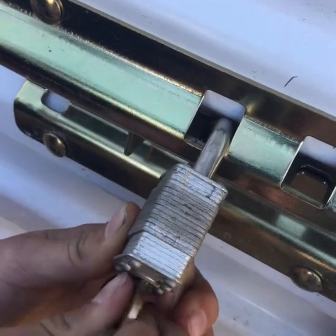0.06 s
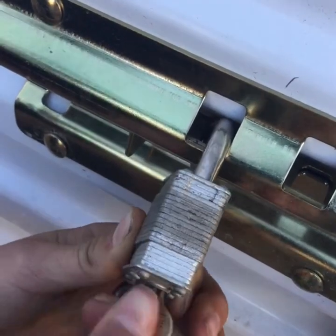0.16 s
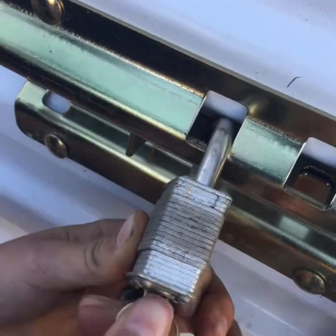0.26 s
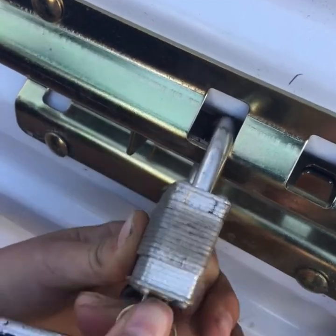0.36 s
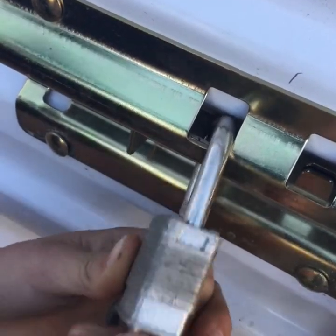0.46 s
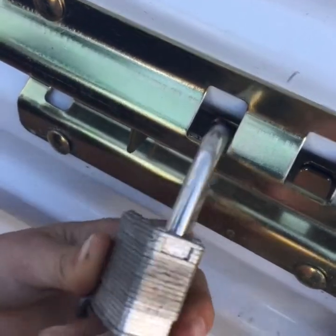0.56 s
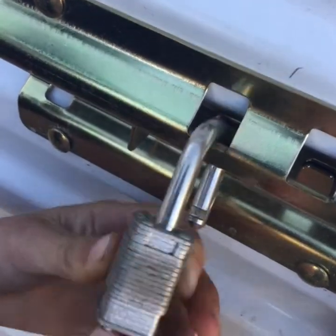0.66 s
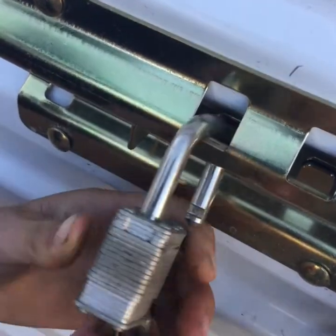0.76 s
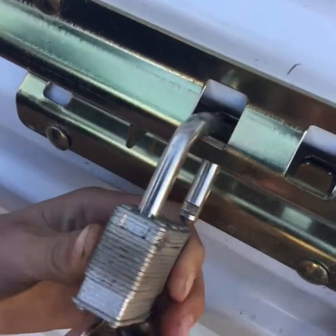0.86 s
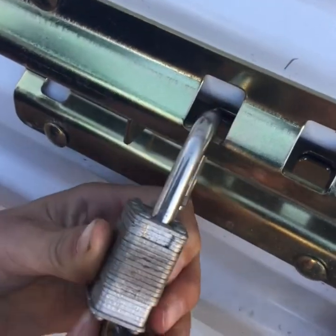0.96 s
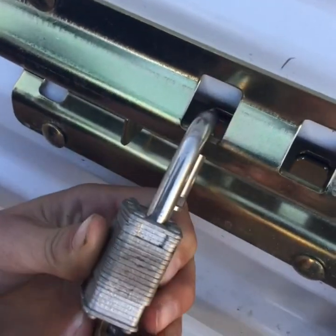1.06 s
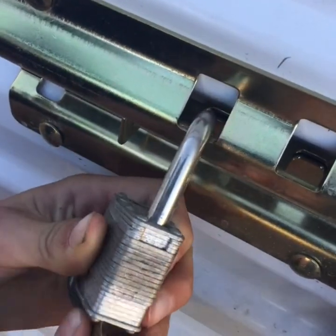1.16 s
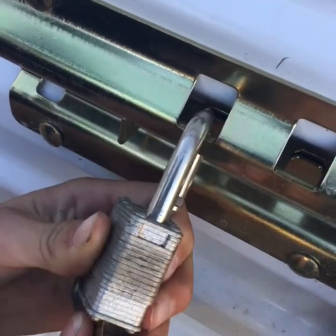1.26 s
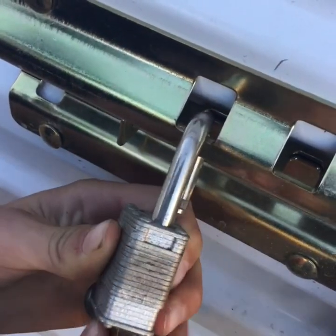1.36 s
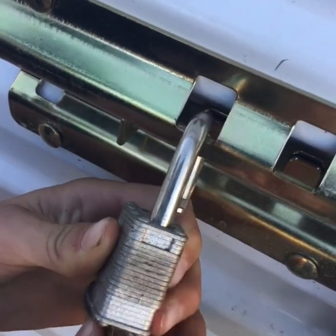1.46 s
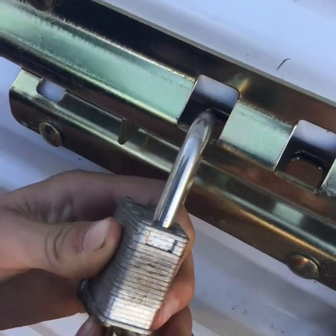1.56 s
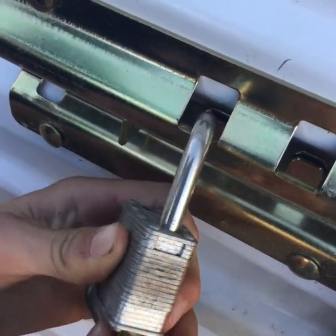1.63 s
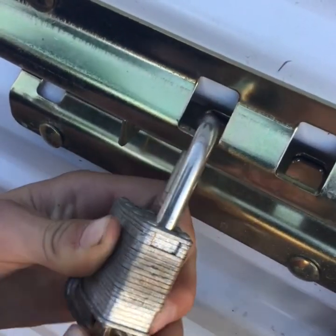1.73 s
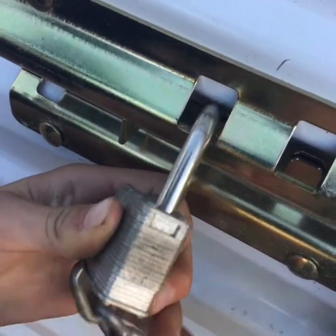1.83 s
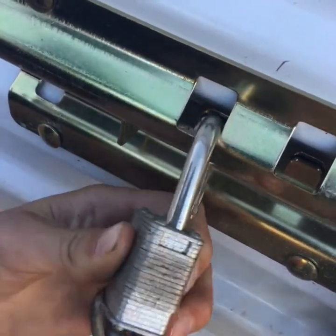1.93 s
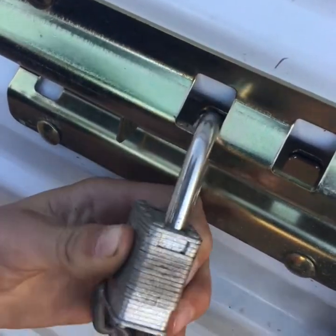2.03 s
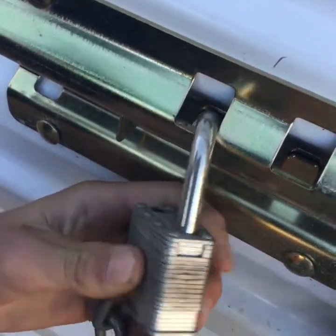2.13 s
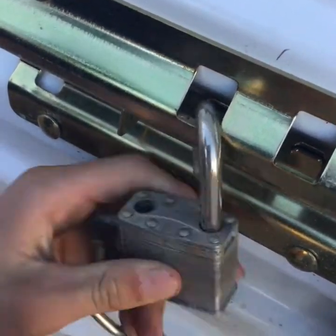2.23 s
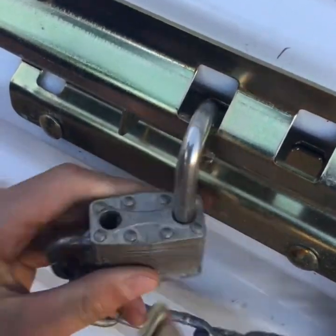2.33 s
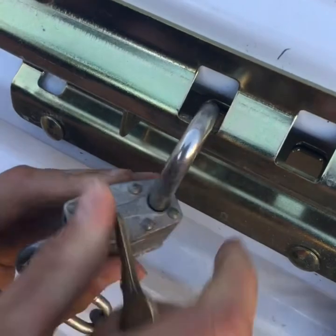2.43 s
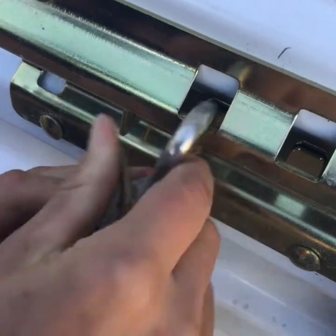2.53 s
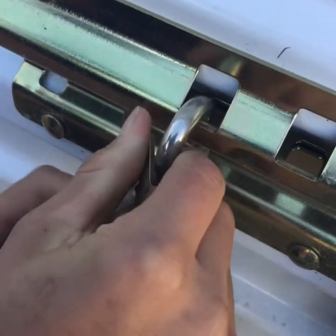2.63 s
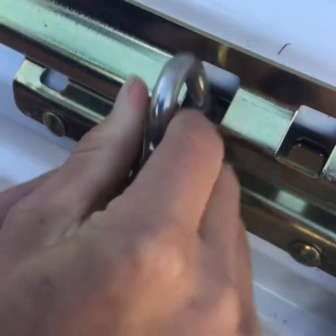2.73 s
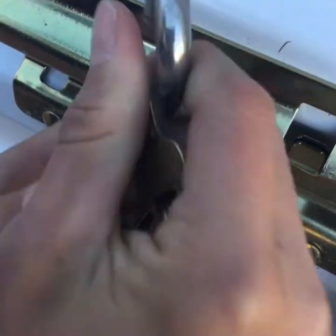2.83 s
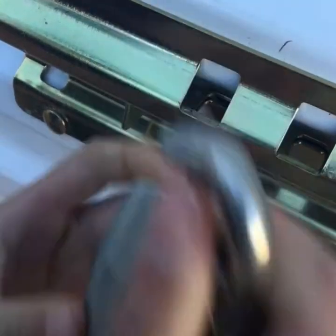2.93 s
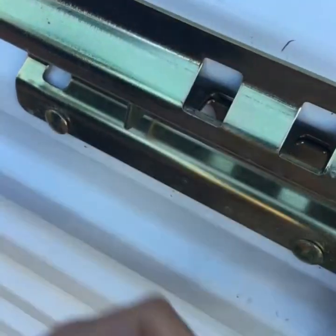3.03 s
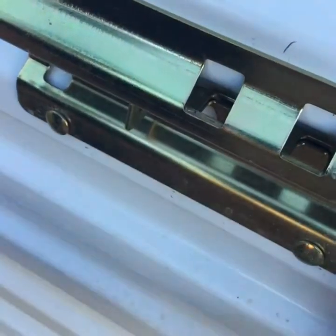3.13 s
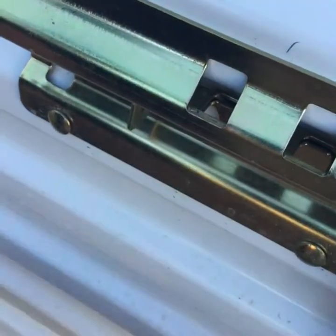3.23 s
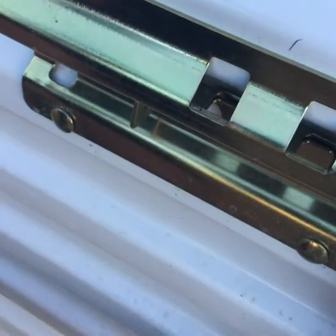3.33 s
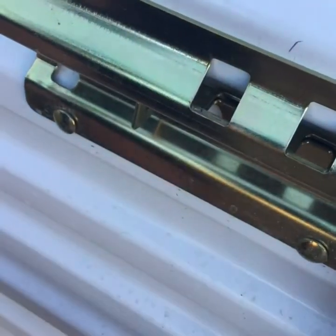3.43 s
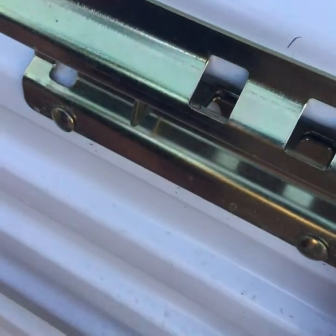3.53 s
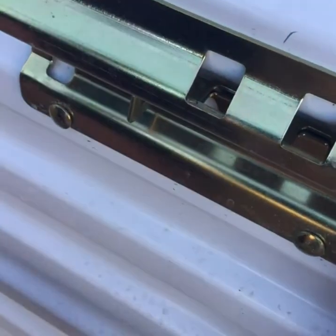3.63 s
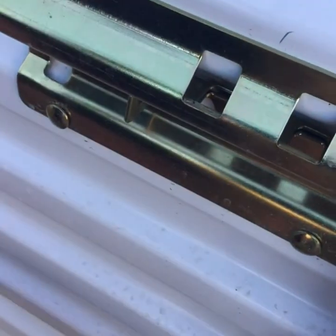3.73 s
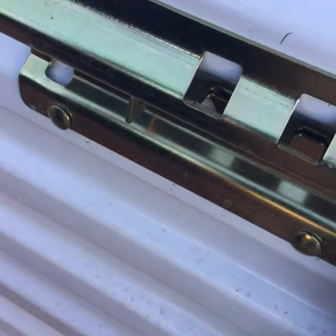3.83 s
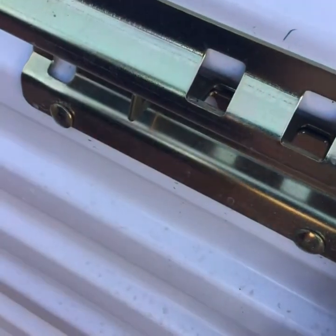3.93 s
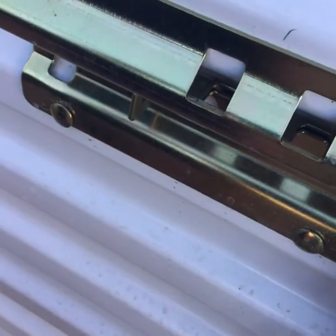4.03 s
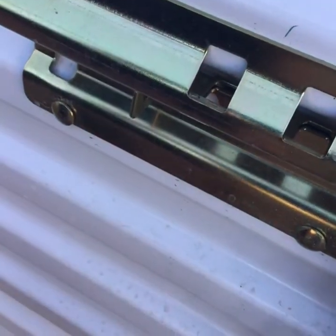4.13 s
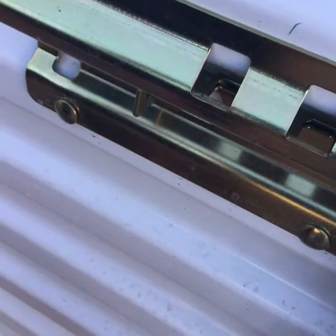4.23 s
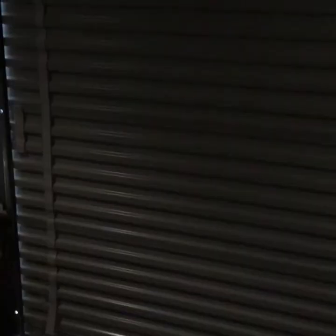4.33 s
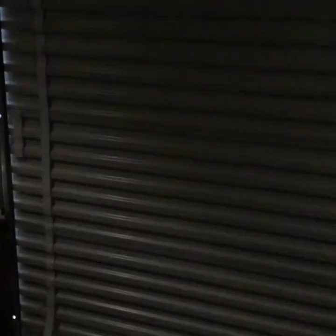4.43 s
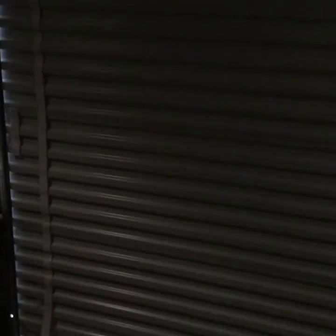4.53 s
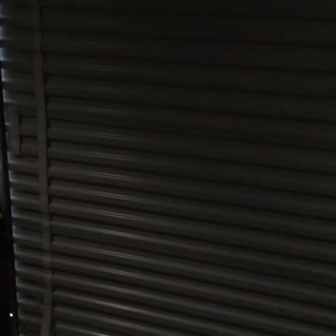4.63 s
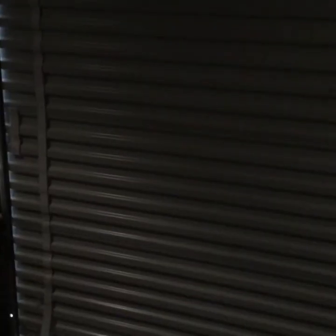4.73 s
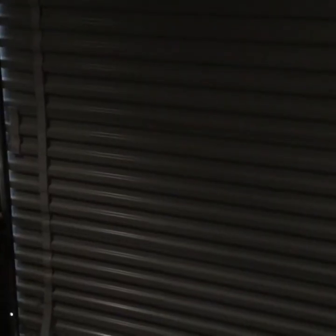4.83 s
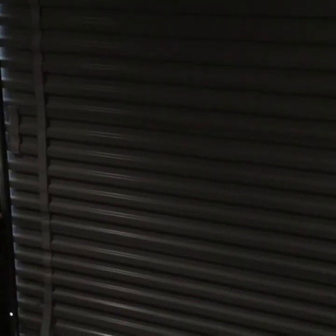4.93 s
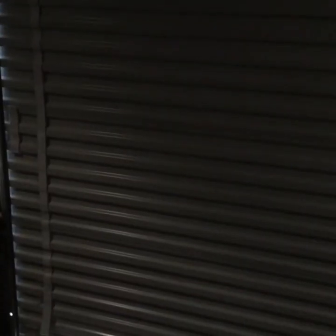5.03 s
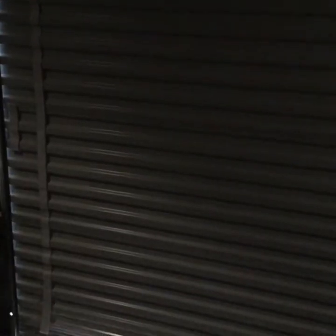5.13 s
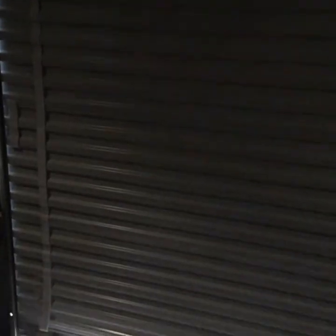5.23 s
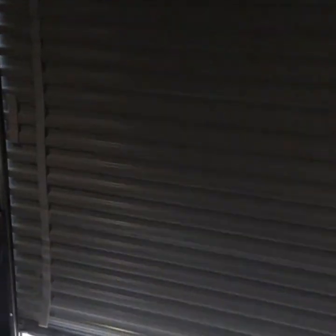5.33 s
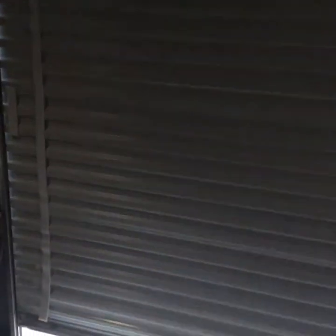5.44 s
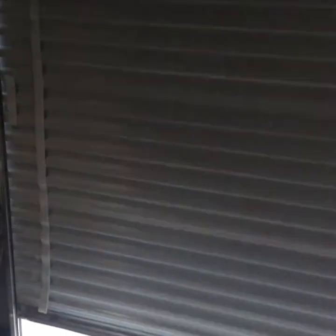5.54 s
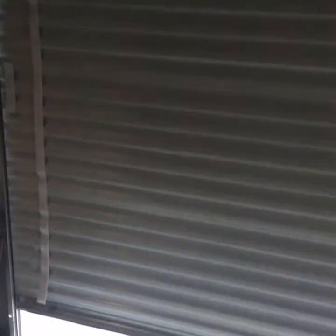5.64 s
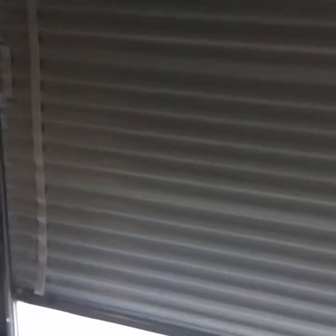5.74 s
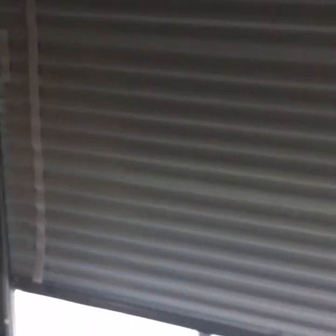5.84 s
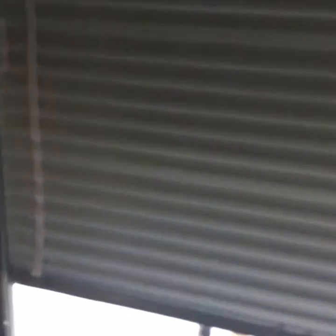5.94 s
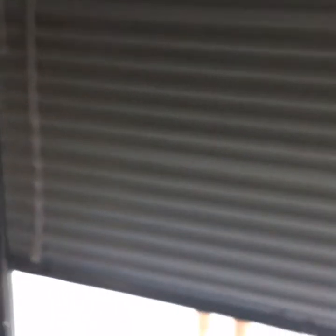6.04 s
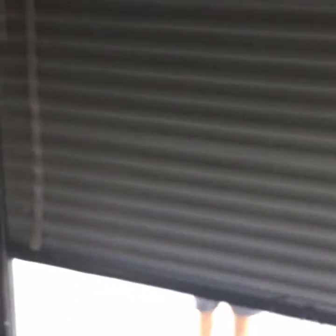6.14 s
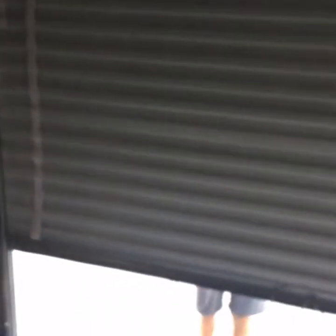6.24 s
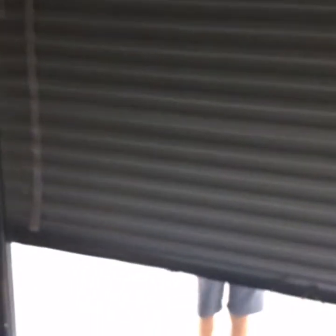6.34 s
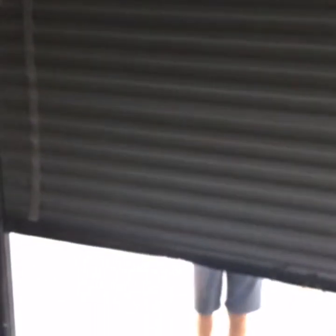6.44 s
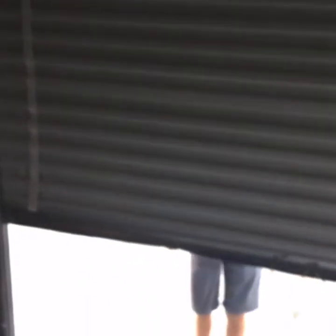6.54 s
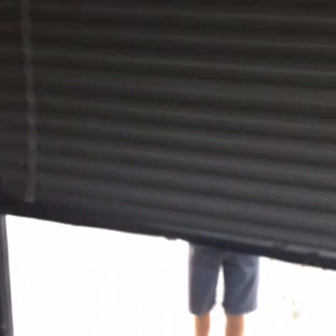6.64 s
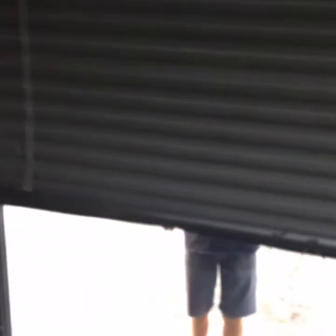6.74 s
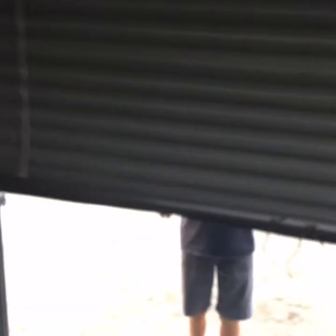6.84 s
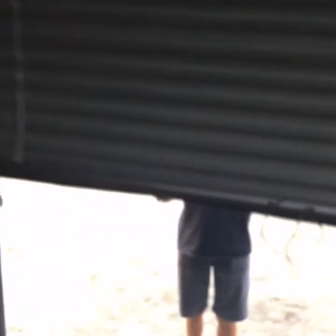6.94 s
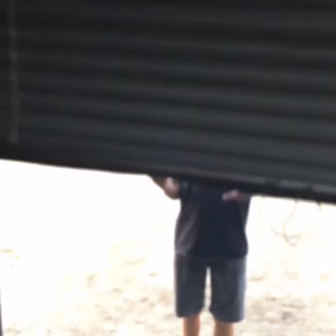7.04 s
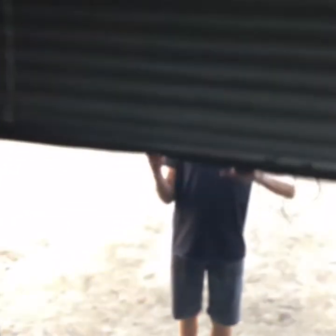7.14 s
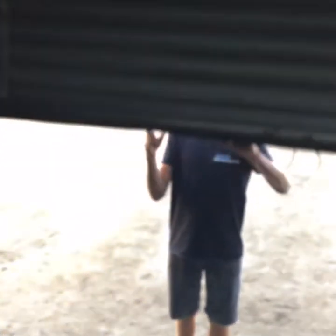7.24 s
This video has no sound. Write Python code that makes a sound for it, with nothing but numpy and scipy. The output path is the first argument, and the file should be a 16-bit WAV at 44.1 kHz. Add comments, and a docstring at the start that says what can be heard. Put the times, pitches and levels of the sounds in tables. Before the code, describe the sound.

Close metallic clicks, scrapes and key jingles, hard bolt bangs, a blink of silence, then a roller door rattling open from inside.

```python
"""A padlock with a bunch of keys is worked out of the steel latch of a roll-up door, heard close by outdoors.
Impulsive contacts excite the latch, its plate and the door's sheet; the keys are decaying modes that
are choked as they touch again, over a clatter of tiny brushes; then the bolt is slammed over.
After a short silence one hears, inside the unit, the corrugated door rattle up its rails as bands of
filtered clicks and noise."""
import sys
import numpy as np
from scipy import signal
from scipy.fft import rfft, irfft
from scipy.io import wavfile
from scipy.ndimage import uniform_filter1d

SR = 44100
rng = np.random.default_rng(int(sys.argv[2]) if len(sys.argv) > 2 else 0)


def inscribe(sig):
    """Save sig as 16-bit PCM at rate SR to the path in sys.argv[1].

    A 1-D sig is mono; a 2-D sig holds one channel per row.
    Samples are clipped to [-1, 1] before scaling.
    """
    pcm = np.round(np.clip(np.atleast_2d(sig).T, -1, 1) * 32767)
    wavfile.write(sys.argv[1], SR, pcm.astype(np.int16))


N = 321489

# All source levels stand before the gain in scene() and the saturation in record().
# Rattles of the keys. Each row: start in seconds, stop in seconds, brushing level in dB, loudest ring in dB,
# how much weaker each next set rings in dB, sets of KEY_MODES that ring (a = first), loudest first.
RATTLES = [(0.018, 0.025, -56, -62, 3, "g"), (0.07, 0.13, -55, -81, 3, "e"),
           (0.129, 0.143, -44, -43, 4, "hiec"), (0.145, 0.155, -42, -36, 3, "bhegic"),
           (0.162, 0.2, -50.5, -44.5, 3.3, "heigc"), (0.202, 0.214, -55, -47, 3.3, "hie"),
           (0.243, 0.266, -52, -45.5, 3, "ehibcfg"), (0.275, 0.36, -61, -55, 9, "f"),
           (0.325, 0.372, -60, -45, 3, "i"), (0.613, 0.686, -44.5, -57, 3, "cbedg"),
           (0.733, 0.824, -49, -34, 8.2, "aebd"), (0.83, 0.887, -48, -43.5, 3, "ec"),
           (0.88, 0.904, -39.5, -49, 3, "eadbg"), (0.93, 0.944, -48, -50, 3, "agb"),
           (0.989, 1.014, -53, -65, 3, "e"), (1.058, 1.126, -77, -45, 13, "ead"),
           (1.168, 1.184, -50.5, -51, 4, "eacd"), (1.203, 1.222, -50, -52, 4, "egc"),
           (1.238, 1.334, -49, -37.5, 3.2, "cefbagd"), (1.4, 1.55, -91, -59, 5, "daf"),
           (1.56, 1.67, -57, -54.5, 3, "d"), (1.698, 1.743, -40.5, -45, 3, "ecabfg"),
           (1.757, 1.81, -46, -47, 4.6, "ecbga"), (1.815, 1.834, -40, -37.5, 2.1, "ecbadfg"),
           (1.87, 1.902, -42, -45, 3, "ecga"), (1.91, 1.975, -46, -38, 10, "ebcdg"),
           (1.97, 2.005, -46.5, -56, 3, "afgec"), (2.034, 2.086, -41, -33.5, 6.8, "ebdgca"),
           (2.075, 2.128, -68.5, -36, 3.1, "gebdac"), (2.135, 2.172, -55, -43, 7.6, "gc"),
           (2.218, 2.28, -52.5, -58, 5.7, "afg"), (2.29, 2.343, -58, -51.5, 3.6, "fead"),
           (2.435, 2.47, -51, -45, 2.5, "dfecg"), (2.547, 2.554, -53, -47, 5.1, "cfeg"),
           (2.56, 2.587, -50, -43, 3, "ahebg"), (2.654, 2.656, -35, -47, 12, "ge"),
           (2.82, 2.893, -54, -61, 4, "cef"), (2.933, 2.985, -51, -39.5, 9.8, "cegb"),
           (2.985, 3.027, -61, -54, 8, "ea"), (3.083, 3.2, -55, -49, 2.1, "edgcbaf"),
           (3.256, 3.276, -54, -51, 1.6, "egac"), (3.39, 3.45, -62, -74, 3, "eg"),
           (3.508, 3.513, -57, -67, 3.1, "e"), (3.534, 3.549, -58, -62, 3.1, "eg"),
           (3.702, 3.742, -60, -62, 2.3, "dbfeg"), (3.768, 3.797, -54, -59, 2.4, "gcdf"),
           (3.998, 4.013, -66, -73, 2.5, "f")]
# Sets of modes that sound together. Each mode: frequency in Hz, level in dB, undamped t60 in seconds.
KEY_MODES = [
    [(6948, 0, 2.5), (2461, -8, 1.1), (8431, -5, 1.2), (13330, -16, .9), (8909, -18, 1.1)],
    [(6713, 0, 1.1), (13040, -9, .9)],
    [(8145, 0, .9)],
    [(6185, 0, 1.4), (6455, -6, 1.5)],
    [(10525, 0, .6), (10700, -6, .6), (13280, -9, .5)],
    [(9216, 0, 1.2), (3440, -5, 1.0)],
    [(14880, 0, 1.5)],
    [(2490, 2, .14), (5250, -8, .15)],
    [(8620, 0, .5), (7250, -2, .3)],
]
# Spectrum of the corrugated sheet. Each row: frequency in Hz, density in dB per Hz.
SHEET_SPECTRUM = [(18, -32.5), (45, -1.5), (270, -4), (500, -3), (800, -3), (1080, -9), (1260, -6),
                  (3880, -20.5), (4870, -17.5), (6250, -28.5), (12000, -54.5), (15600, -82.5)]
LOCK_OUT_S = 3.3  # the padlock leaves the latch


def undb(db):
    """Amplitude ratio of a level: twenty decibels per factor of ten."""
    return 10 ** (np.asarray(db) / 20)


def unit(x):
    """Normalisation to an rms of 1."""
    return x / np.sqrt(np.mean(x ** 2))


def curves(table):
    """Linear interpolation in time of the columns of a table, the first being seconds."""
    s, *columns = np.transpose(table)
    return [np.interp(np.arange(N) / SR, s, c) for c in columns]


def band(x, lo_hz, hi_hz):
    """Butterworth band-pass: only the frequencies between two edges pass."""
    edges = [lo_hz, min(hi_hz, .48 * SR)]
    return signal.sosfilt(signal.butter(3, edges, "band", fs=SR, output="sos"), x)


def colour(x, points):
    """Minimum-phase filter of a (Hz, dB) spectrum: folding the cepstrum of its log gain makes it causal."""
    hz, db = np.transpose(points)
    grid = np.linspace(1, SR / 2, num=2049)
    log_gain = np.log(undb(np.interp(np.log(grid), np.log(hz), db)))
    cepstrum = irfft(log_gain)
    cepstrum[1:2048] *= 2
    cepstrum[2049:] = 0
    response = irfft(np.exp(rfft(cepstrum)))
    return signal.oaconvolve(x, response, axes=-1)[:len(x)]


def clatter(per_s, spread_db, hiss):
    """Shot noise: random clicks of very unequal size over a share of hiss, at rms 1."""
    chance = rng.random((3, N))
    occurs = chance[0] < per_s / SR
    polarity = np.sign(chance[1] - .5)
    size = undb(-spread_db * np.log(chance[2] + 0.011))
    return unit(unit(occurs * polarity * size) + hiss * rng.standard_normal(N))


def walk(rate):
    """Slow random modulation: levels held for 1 / rate seconds and averaged twice; spread near 1."""
    k = int(SR / rate)
    held = np.repeat(rng.standard_normal(N // k + 1), k)
    return 1.3 * uniform_filter1d(uniform_filter1d(held, k), k)[:N]


def sheet_response():
    """Impulse response of the sheet: a dense modal field that dies fastest in the treble, and a few strong modes."""
    # Each row: frequency in Hz, t60 in seconds.
    decay_times = [(60, 0.8), (420, 0.43), (1300, 0.55), (2600, 0.45), (4500, 0.25), (7700, 0.17),
                   (16000, 0.08)]
    # Modes that stand out. Each row: frequency in Hz, relative level in dB, t60 in seconds.
    strong_modes = [(318, 2, .5), (690, 1, .3), (1289, 0, .5), (1405, 0, .45), (1728, 0, .4),
                    (2135, -2, .35), (2306, -2, .35), (2418, -4, .3)]
    t = np.arange(SR) / SR
    hz, t60 = np.transpose(decay_times)
    dense = 0
    for lo in 30 * 2. ** np.arange(0, 9, .5):  # half-octave bands
        centre = lo * 2 ** (1 / 4)
        decay = np.log(1000) / np.interp(np.log(centre), np.log(hz), t60)
        noise = band(rng.standard_normal(SR), lo, np.sqrt(2) * lo)
        dense = dense + np.sqrt(decay) * np.exp(-decay * t) * noise  # the same energy at any decay
    rings = sum(undb(db) * np.sin(2 * np.pi * f * t) * 1000 ** (-t / d) for f, db, d in strong_modes)
    return (unit(colour(dense, SHEET_SPECTRUM)) + undb(-11) * unit(rings)) / np.sqrt(SR)


def contact_forces():
    """Impact with rebounds: each blow is a tick and a dying chatter; rows feed body, treble, boom, brief boom."""
    # The lock knocks the latch. Each row: time in seconds, level in dB, boom of the sheet in dB re that level.
    knock_rows = [(0.13, -33, -6.5), (0.243, -34, -17), (0.324, -32.5, -6.5), (0.3605, -30, 0),
                  (0.375, -39, -14), (0.381, -6, -31), (0.396, -20.5, -10), (0.407, -17, -3.5),
                  (0.418, -19, -41), (0.456, -15, -27), (0.528, -34, -28), (0.547, -23.5, -24),
                  (0.613, -31, -8.5), (0.705, -20, -19.5), (0.8689, -16, -19.5), (1.0176, -28, -48),
                  (1.229, -27.5, -13.5), (1.475, -38.5, -2.5), (1.613, -37.5, 0.5), (1.63, -28.5, -8.5),
                  (1.66, -25.5, -22), (1.724, -30.5, -6), (1.736, -16.5, -5.5), (1.7496, -18.5, -14.5),
                  (1.769, -13.5, -45), (1.81, -12.5, -16.5), (1.8365, -22.5, -13), (1.876, -28, -17.5),
                  (2.0595, -27.5, -37.5), (2.1318, -22.5, -10.5), (2.172, -36, -20), (2.2509, -33.5, -5),
                  (2.2864, -25.5, -28), (2.3215, -20, -38), (2.4326, -36, -12.5), (2.5027, -31.5, -22),
                  (2.6299, -14, -17.5), (2.6731, -14.5, -6.5), (3.0808, -35, 1), (3.1344, -30, -0.5)]
    # The bolt is slammed over and rebounds. Each row: time in seconds, level in dB, boom in dB re that level,
    # softness of the contact as a time constant in milliseconds.
    slam_rows = [(3.2218, -5, -18, 0.0085), (3.229, -4.5, -36.5, 0.02), (3.292, -13, -22, 0.062),
                 (3.3556, 1.5, -19, 0.012), (3.3701, 0.5, -21.5, 0.035), (3.414, 0.5, -16.5, 0.064),
                 (3.442, -5.5, -23.5, 0.031), (3.503, -22.5, -26, 0.029), (3.8536, -15.5, 0, 0.0083),
                 (4.085, 0, -20.5, 0.049), (4.2216, -32, 6, 0.052)]
    chatter_t60_s, brief_t60_s = 0.065, 0.052
    force = np.zeros((4, N))
    bounces = clatter(5000, spread_db=3.0, hiss=0.81)
    t = np.arange(SR // 10) / SR
    brief = 1000 ** (-t / brief_t60_s)  # only the first bounces are heavy enough to move the bolt
    tick = 1000 ** (-t[:SR // 2000] / 0.00025)
    # light knocks have relatively more treble than heavy ones
    blows = [(s, db, boom, -8.5 - 0.56 * (db + 27.5), 0, 4.1) for s, db, boom in knock_rows]
    blows += [(s, db, boom, -18, soft_ms, 2.2) for s, db, boom, soft_ms in slam_rows]
    for s, db, boom_db, treble_db, soft_ms, tick_size in blows:
        i = int(s * SR)
        push = (1 - np.exp(-t / 0.00029)) * 1000 ** (-t / chatter_t60_s) * bounces[i:i + len(t)]
        push[:SR // 2000] += tick_size * tick  # first contact is one hard tick
        push = undb(-16) * unit(push)  # the same energy however the bounces fall
        slow = np.exp(-1000 / SR / max(soft_ms, 1e-4))  # a softer contact pushes longer and loses its treble
        push = signal.lfilter([(1 - slow) ** 2], [1, -2 * slow, slow ** 2], push)
        gains = undb(db + np.array([[0], [treble_db], [boom_db], [boom_db]]))
        force[:, i:i + len(t)] += gains * [push, push * brief ** 0.66, push, push * brief]
    return force


def latch():
    """Source and resonator: contact forces crack in the latch and ring on in the sheet; friction scrapes both."""
    # Fumbling. Each row: time in seconds, scrape of steel on the latch in dB, rumble in the sheet in dB,
    # deep bass in dB re rumble.
    fumbling = [(0, -31, -29.5, -1), (0.06, -38, -36.5, 1), (0.12, -42, -42, 1), (0.22, -44, -45.5, 0),
                (0.33, -48.5, -44, 1.5), (0.5, -44.5, -42.5, -6.5), (0.8, -47.5, -46, 3.5),
                (1.43, -51.5, -51, 6), (1.6, -52, -53, 10.5), (1.68, -42.5, -37, 6.5),
                (1.85, -31.5, -35.5, 1), (2.0, -50, -45.5, 1), (2.2, -42, -42, -1), (2.4, -44.5, -48, 0),
                (2.53, -53.5, -46.5, -4), (2.61, -36, -37, -7), (3.05, -48.5, -43.5, -1.5),
                (3.12, -35.5, -46, -8), (3.2, -44, -55, -4), (3.55, -33.5, -30.5, -12),
                (3.8, -42.5, -41.5, 1.5), (4.27, -43, -38.5, 0.5)]
    # Spectrum of the latch. Each row: frequency in Hz, density in dB per Hz.
    latch_spectrum = [(120, -48.5), (200, -15.5), (1000, -2), (1770, -2), (3900, -6), (4680, -1),
                      (6170, -10), (6880, -11), (8580, -7), (16000, -46.5)]
    body_force, treble_force, boom_force, brief_force = contact_forces()
    scrape_db, rumble_db, deep_db = curves(fumbling)
    scrape = undb(scrape_db + 3.04 * walk(25.16)) * clatter(1400, spread_db=3.0, hiss=0.95)
    rumble = undb(rumble_db + 1.0 * walk(15)) * rng.standard_normal(N)
    body, sheet = colour(body_force, latch_spectrum), sheet_response()

    crack = undb(2.5) * band(body, 540, 5800)
    crack += undb(-1.0) * band(band(treble_force, 4900, 11000), 4000, 12000)
    ring = signal.oaconvolve(undb(-9.5) * body_force, band(sheet, 920, 12000))[:N]
    boom_response = band(sheet, 43, 1100) + undb(-6.5) * band(sheet, 2400, 2700)
    boom = signal.oaconvolve(undb(-1.0) * boom_force + undb(3.5) * brief_force, boom_response)[:N]
    thud = undb(14) * band(brief_force, 180, 1150)  # the bolt's own dull, short body

    hooked = np.arange(N) < LOCK_OUT_S * SR
    lock_scrape, bolt_scrape = scrape * hooked, scrape * ~hooked
    rub = undb(11) * band(colour(lock_scrape, SHEET_SPECTRUM), 700, 11000)
    rub += undb(-11.0) * band(colour(lock_scrape, latch_spectrum), 2500, 9900)
    rub += undb(15.0) * band(colour(bolt_scrape, SHEET_SPECTRUM), 800, 2600)  # the loose bolt buzzes on, duller
    rub += undb(-20.5) * band(colour(bolt_scrape, latch_spectrum), 4000, 11000)
    rub += undb(11.5) * band(rumble, 124.4, 430) + undb(19.0) * band(undb(deep_db) * rumble, 49, 110)
    return crack + ring + boom + thud + rub


def jingle():
    """Random impulses on damped resonators: keys brush each other in tiny clicks and short pings."""
    # How readily each set in KEY_MODES answers a light brush. Each entry: relative level in dB.
    brushed_db = [-2.5, -5, 3, -8.5, 2.5, -4, -8, -4, -7]
    t = np.arange(N) / SR
    busy = undb(-61.0) * (t < LOCK_OUT_S)  # faint brushing between the rattles
    for start, stop, db, *_ in RATTLES:
        busy = busy + undb(db) * (t > start) * 1000 ** (-np.clip(t - stop, 0, 1) / 0.087)
    taps = busy * clatter(65, spread_db=5.0, hiss=0)
    out = undb(-5) * band(taps, 4300, 5800)

    shake_db = 1.7 * walk(50)
    for lo in 3600 * 2 ** np.arange(0, 2.1, 1 / 3):  # each pitch range has its own tiny touches
        touch = busy * undb(shake_db + 2.1 * walk(34.68)) * clatter(400, spread_db=3.5, hiss=0.3)
        out = out + undb(-4.0 - 3.6 * np.log2(lo / 6000)) * band(touch, lo, 1.19 * lo)

    t = t[:SR // 10]
    small_modes_hz = np.geomspace(5000, 15000, num=16) * (1 + .03 * rng.standard_normal(16))
    for hz in small_modes_hz:  # many small modes clink briefly
        clink = np.sin(2 * np.pi * hz * t) * 1000 ** (-t / 0.029)
        out = out + undb(-37) * signal.oaconvolve(busy * clatter(45, spread_db=4.0, hiss=0), clink)[:N]

    for db, key in zip(brushed_db, KEY_MODES):  # each key is touched on its own
        muted = sum(undb(g) * np.sin(2 * np.pi * f * t) for f, g, _ in key if f > 5000) * 1000 ** (-t / 0.08)
        touches = busy * clatter(60, spread_db=4.0, hiss=.12)
        out = out + undb(db - 38) * signal.oaconvolve(touches, muted)[:N]
    return out


def ring_levels(top_db, step_db, sets):
    """Modal excitation: level of each set in KEY_MODES in one rattle; sets not named stay still."""
    return [top_db - step_db * sets.find(name) if name in sets else -np.inf for name in "abcdefghi"]


def keys():
    """Free modal vibration: struck at the start, decaying exponentially, choked in milliseconds at the stop."""
    held = 0.61  # fingers on the bunch shorten every t60 to this share
    out = np.zeros(N)
    chance = rng.standard_normal((len(RATTLES), 2 * sum(map(len, KEY_MODES))))
    shimmer = [undb(3.4 * walk(70)) for _ in KEY_MODES]  # light brushes keep nudging each ring
    for (start, stop, _, *struck), draw in zip(RATTLES, chance):
        t = np.arange(int((stop - start + 0.03) * SR)) / SR
        onset = 1 - np.exp(-t / 0.00044)
        choke = 1000 ** (-np.maximum(t - (stop - start), 0) / 0.012)
        now = slice(int(start * SR), int(start * SR) + len(t))
        sets = zip(ring_levels(*struck), KEY_MODES, shimmer)
        modes = [(f, db + g, d, nudge[now]) for db, key, nudge in sets for f, g, d in key]
        for k, (f, db, t60, nudge) in enumerate(modes):
            detune, level_draw = draw[2 * k], draw[2 * k + 1]
            tone = np.sin(2 * np.pi * f * (1 + .001 * detune) * t + 10 * detune)
            decay = 1000 ** (-t / (held * t60))
            out[now] += undb(db + 1.8 * level_draw) * nudge * onset * choke * decay * tone
    return out


def thuds():
    """Modal synthesis of a plate: heavy, dull blows ring its low modes; sharp ones leave a brief steel note."""
    # Heavy blows on the latch plate. Each row: time in seconds, level in dB, tilt in dB per octave.
    heavy_blows = [(0.264, -39, 0), (2.209, -40, 5.5), (2.219, -33, 6), (2.663, -26.5, 4), (2.6737, -18, 1),
                   (2.684, -27, -1), (3.853, -20.5, 2), (3.861, -20.5, 0.5)]
    # Modes of the plate. Each row: frequency in Hz, relative level in dB, t60 in seconds.
    plate_modes = [(129, -4.5, 0.088), (240, -5, 0.037), (354, -2, 0.072), (558, -4.5, 0.052),
                   (696, -1.7, 0.12), (828, -3.5, 0.091), (955, -7.5, 0.11), (1220, -9.5, 0.061),
                   (1500, -16, 0.046)]
    # Brief notes of the shackle on the latch. Each row: time in seconds, frequency in Hz, level in dB.
    steel_notes = [(0.382, 2510, -17), (0.406, 4440, -23), (0.418, 5600, -27), (0.455, 4330, -22.5),
                   (0.706, 1650, -34), (0.869, 1950, -37), (1.018, 1830, -37.5), (2.322, 1500, -43),
                   (2.321, 5000, -27), (2.634, 1570, -36), (2.674, 2710, -25), (3.135, 5100, -31)]
    cycles_to_die, pair_ratio = 170, 1.2  # cycles to fall by 60 dB; pitch of a close second mode
    out, t = np.zeros(N), np.arange(SR // 4) / SR
    chance = rng.standard_normal((len(heavy_blows), 3 * len(plate_modes)))
    for (s, db, tilt_db), draw in zip(heavy_blows, chance):
        i = int(s * SR)
        for k, (f, g, t60) in enumerate(plate_modes):
            detune, level_draw, phase = draw[3 * k:3 * k + 3]
            tone = np.sin(2 * np.pi * f * (1 + .04 * detune) * t + 1.2 * phase)
            shape = (1 - np.exp(-t / 0.00056)) ** 2 * 1000 ** (-t / t60)
            mode_db = db + g + tilt_db * np.log2(f / 700) + 0.93 * level_draw
            out[i:i + len(t)] += undb(mode_db) * shape * tone
    for s, hz, db in steel_notes:
        i = int(s * SR)
        pair = np.sin(2 * np.pi * hz * t) + 0.4 * np.sin(2 * np.pi * pair_ratio * hz * t)
        shape = (1 - np.exp(-t / 0.0003)) * 1000 ** (-t * hz / cycles_to_die)
        out[i:i + len(t)] += undb(db) * shape * pair
    return out


def door():
    """Impacts smeared by reverberation: slats knock in the rails in uneven bursts, over a wavering narrow-band hum."""
    # The door going up. Each row: time in seconds, rumble in dB, jolting in dB (how far rattle and rails
    # stand out, before the weights below).
    lift = [(4.37, -38, 6.5), (4.6, -38, -4), (4.9, -48.5, -10), (5.05, -51.5, -5.5), (5.2, -46, 1.5),
            (5.53, -40, 0.5), (5.6, -29, 0), (5.75, -30.5, -1.5), (5.9, -29.5, 2), (6.25, -25, -2.5),
            (6.33, -25.5, 0), (6.42, -28.5, -5), (6.6, -28.5, -3), (6.86, -34, -3), (6.9, -28.5, -6),
            (7.0, -31, 1), (7.18, -26.5, -1.5), (7.29, -26.5, 2)]
    # Slats catch in the rails. Each row: time in seconds, sudden change of rattle in dB, of rails in dB,
    # ring of the slat in dB.
    jolts = [(4.595, 5, 5.5, -58), (5.581, 1, -3, -35.5), (5.627, 4.5, 2, -33), (5.73, 8.5, -2, -44),
             (5.861, 4.5, 1, -48), (6.02, 1.5, -6, -33), (6.13, 1.5, 0.5, -39), (6.22, 2.5, 3, -26),
             (6.25, -1.5, 2, -37), (6.995, 1, 0, -44), (7.05, 1, -5.5, -40), (7.197, 3.5, 2.5, -31)]
    # Spectrum of the door. Each row: frequency in Hz, density in dB per Hz.
    door_spectrum = [(15, -30), (25, -24), (59, -0.5), (120, -2.5), (165, 1.5), (195, -4), (293, -1),
                     (463, -9.5), (695, -10), (1200, -12.5), (1780, -17.5), (2000, -24.5), (2500, -24),
                     (3720, -32), (5200, -28.5), (6050, -38), (8830, -42), (16000, -67)]
    # Faint ticks while the door rests. Each row: time in seconds, impulse level before the band-pass in dB.
    faint_ticks = [(4.91, -40), (4.949, -47)]
    # Wavering low tones inside the unit. Each row: frequency in Hz, width in Hz, level in dB.
    hum_tones = [(117.3, 12, -54.5)]
    jolt_fade_s, slat_fade_s = 0.049, 0.036
    slat_hz, slat_width_hz = 688, 137
    rumble_db, jolt_db = curves(lift)
    now = np.arange(N) / SR

    def fade(s, fade_s):
        """Transient envelope: a quick rise at s and an exponential fall."""
        return np.clip((now - s) / 0.0026, 0, 1) * np.exp(-np.abs(now - s) / fade_s)

    # rattle and rails relative to the rumble
    rattle_db = -3 + 0.9 * jolt_db + sum(db * fade(s, jolt_fade_s) for s, db, _, _ in jolts)
    rails_db = -17 + 1.23 * jolt_db + sum(db * fade(s, jolt_fade_s) for s, _, db, _ in jolts)
    slat_noise = clatter(300, spread_db=4.5, hiss=1.0)
    slat = unit(band(slat_noise, slat_hz - slat_width_hz / 2, slat_hz + slat_width_hz / 2))
    t = np.arange(SR // 2) / SR
    box = rng.standard_normal(len(t)) * 1000 ** (-t / 0.05)  # short reverberation of the steel box
    shake_db = 1.1 * walk(30)
    out = slat * sum(undb(db) * fade(s, slat_fade_s) for s, _, _, db in jolts)

    # rumble, rattle and rails: lower edge in Hz, upper edge in Hz, level in dB re rumble, clicks per second
    layers = (20, 533, -0.47, 830), (470, 2600, rattle_db, 1300), (2380, 22000, rails_db, 1500)
    for lo_hz, hi_hz, db, per_s in layers:
        knocks = clatter(per_s, spread_db=2.0, hiss=1.0)
        knocks = 0.2 * unit(signal.oaconvolve(knocks, box)[:N]) + knocks
        level = undb(rumble_db + db + shake_db + 1.1 * walk(12))
        out = out + level * unit(band(colour(knocks, door_spectrum), lo_hz, hi_hz))
    for s, db in faint_ticks:
        out[int(s * SR):][:len(t)] += undb(db) * band(1. * (t == 0), 2520, 7800)
    for hz, width, db in hum_tones:
        out = out + undb(db) * unit(band(rng.standard_normal(N), hz - width / 2, hz + width / 2))
    return out


def scene():
    """Superposition of sources: outdoors at the latch, a gap of silence, then indoors."""
    # Overall gain, with the gap. Each row: time in seconds, gain in dB.
    gain_points = [(4.232, 10), (4.261, 1), (4.274, -35), (4.289, -68), (4.292, -120), (4.367, -120),
                   (4.3703, 7)]
    gap_middle_s = np.mean([gain_points[4][0], gain_points[5][0]])
    inside = np.arange(N) / SR > gap_middle_s
    sound = np.where(inside, door(), latch() + thuds() + keys() + jingle())
    return (sound * undb(curves(gain_points)[0]))[None]


def record(dry):
    """Saturation and band-limiting: the phone rounds the loudest peaks and cuts the top."""
    top_hz = 15900
    rounded = 1.027 * np.tanh(dry / 1.766)
    return signal.sosfilt(signal.ellip(8, .2, 80, top_hz, fs=SR, output="sos"), rounded)


dry = scene()
out = record(dry)
inscribe(out)
```